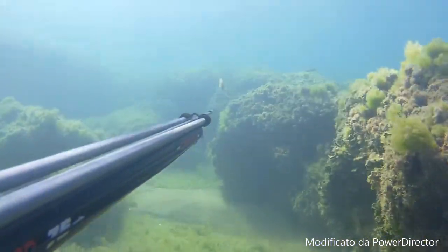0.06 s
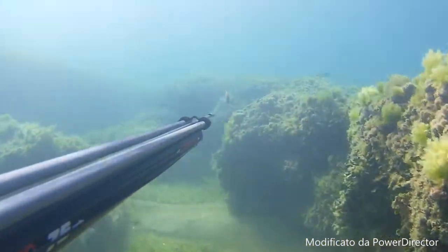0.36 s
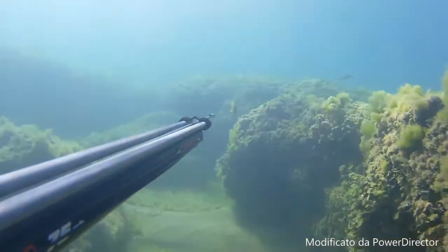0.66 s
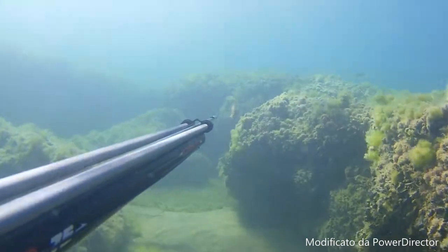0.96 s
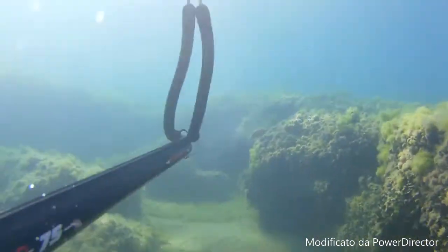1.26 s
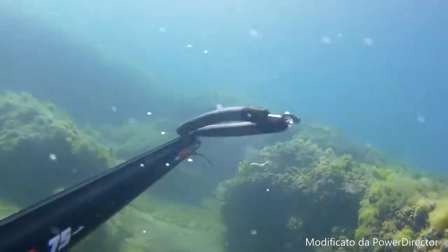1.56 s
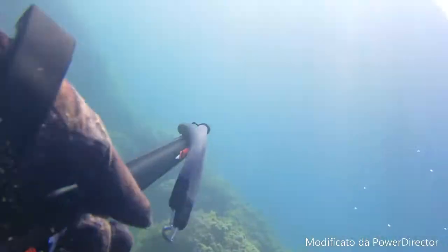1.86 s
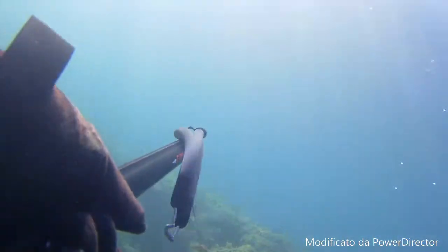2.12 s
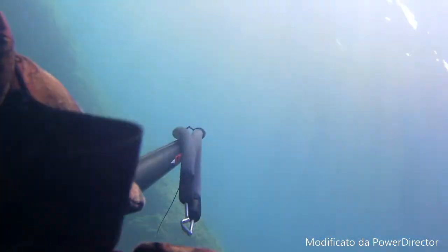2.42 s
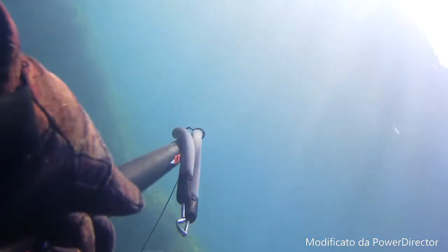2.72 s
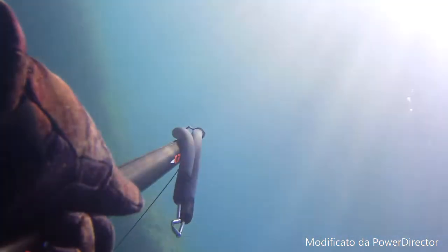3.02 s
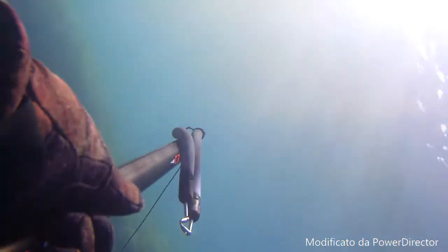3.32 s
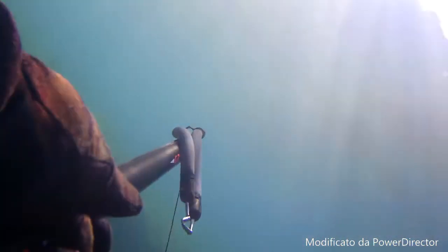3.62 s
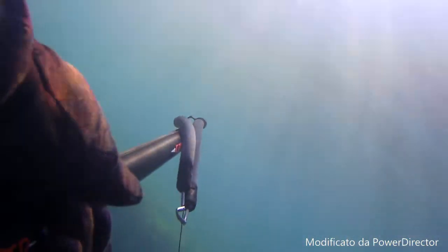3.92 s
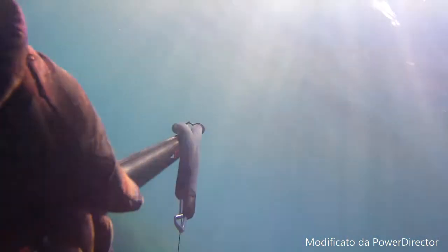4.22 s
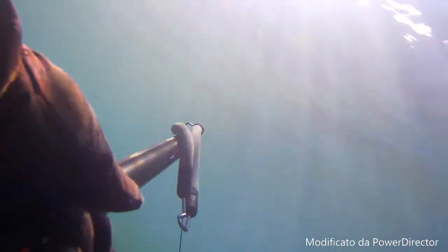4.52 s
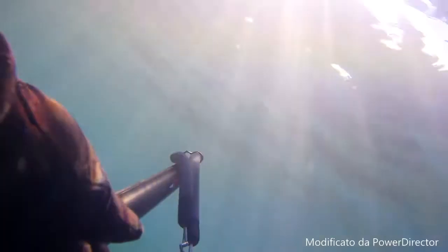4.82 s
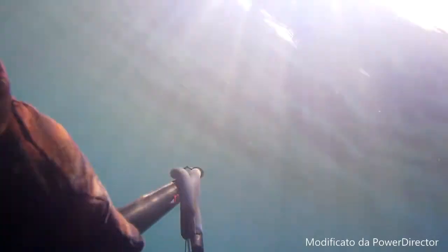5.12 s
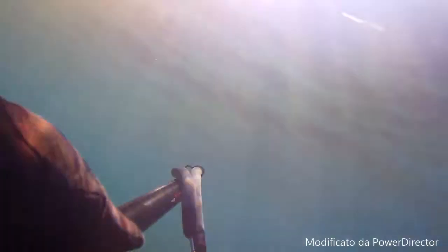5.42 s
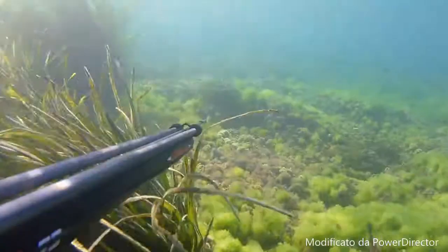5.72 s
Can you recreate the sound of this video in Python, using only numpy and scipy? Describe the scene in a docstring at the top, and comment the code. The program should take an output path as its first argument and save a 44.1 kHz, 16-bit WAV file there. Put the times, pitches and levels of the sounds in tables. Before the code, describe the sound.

A sharp, rattling speargun shot underwater, then bubbles, light clicks, faint glove squeaks and two hard knocks over a soft sea wash.

```python
"""First comes a soft wash of shallow sea over a faint rumble, heard from a camera's watertight case.
Then a rubber-band speargun fires right beside it: the steel spear rattles down the barrel and overloads
the microphone, bubbles churn and the camera mount wobbles. The slack bands and their wishbone (the wire
that pulls the spear) knock about. Later a glove rubs, squeaks and bumps on the case."""
import sys
import numpy as np
from scipy import signal
from scipy.fft import rfft, irfft, next_fast_len
from scipy.io import wavfile

SR = 44100
rng = np.random.default_rng(int(sys.argv[2]) if len(sys.argv) > 2 else 0)


def wrap_up_sound(samples):
    """Save the sound to the file named by the first command line argument, as 16-bit audio."""
    columns = np.atleast_2d(samples).T
    # keep every value between -1 and 1, then stretch to whole-number steps
    tamed = np.clip(columns, -1, 1)
    steps = np.round(tamed * 32767).astype(np.int16)
    wavfile.write(sys.argv[1], SR, steps)


N = 258867
T = np.arange(N) / SR


def undb(db):
    """Turn decibels into a number to multiply by."""
    return 10 ** (np.asarray(db) / 20)


def unit(x):
    """Scale a signal to an average strength (rms) of 1."""
    return x / np.sqrt(np.mean(x ** 2))


def swell(movements, ramp_db=20):
    """Loudness over time: each row climbs ramp_db during its rise, holds, and drops as much in its fall."""
    t = T[::40]
    start, rise, hold, fall, db = np.transpose(movements)[:, :, None]
    before = np.maximum((start + rise - t) / rise, 0)
    after = np.maximum((t - start - rise - hold) / fall, 0)
    gain = undb(db - ramp_db * np.minimum(before + after, 10))
    return np.interp(T, t, np.sqrt(np.sum(gain ** 2, axis=0)))  # overlaps add in power


def colour(x, points, tilt_db=0):
    """Shape the lows and highs by (f/Hz, level/dB) points and a tilt per octave; the result has rms 1."""
    size = next_fast_len(len(x))
    octave = np.log2(np.maximum(np.arange(size // 2 + 1) * SR / size, 1))
    hz, db = np.transpose(points)
    tilted_db = db + tilt_db * np.log2(hz / hz[0])
    gain = undb(np.interp(octave, np.log2(hz), tilted_db))
    return unit(irfft(rfft(x, size) * gain, size)[:len(x)])


def wander(rate):
    """A random curve of rms 1 that changes course about rate times a second."""
    knots = rng.standard_normal(4096)
    return unit(np.interp(T * rate, np.arange(len(knots)), knots))


def ticks(rate, spread_db):
    """Tiny random clicks of uneven size, about rate a second."""
    hits = rng.random(N) < rate / SR
    return hits * rng.choice([-1, 1], N) * undb(spread_db * rng.standard_normal(N))


def fade(t, t60):
    """Die away by 60 dB in t60 seconds, the ring time."""
    return np.exp(-np.log(1000) * t / t60)


def add(out, s, sound):
    """Mix a sound in at s seconds."""
    start = int(s * SR)
    out[start:start + len(sound)] += sound[:N - start]


# Tone of the sea: f/Hz, relative level/dB
SEA_TONE = [(12, -38), (20, -1.5), (38, -8), (55, -23), (81, -12.5), (107, -12.5), (210, -13), (410, -15.5),
            (542, -17.5), (780, -20), (1480, -26.5), (2200, -31.5), (14700, -48.5), (16000, -47)]
def sea(level_db=-53):
    """Shallow water makes a soft, nearly even wash."""
    return undb(level_db + .5 * wander(14)) * colour(rng.standard_normal(N), SEA_TONE)


# Jolts of the camera mount: t/s, slow wobble level/dB, fast wobble level/dB, ring time/s
MOUNT_JOLTS = [(1.1435, 7, 5.5, 0.53), (1.412, -10.5, -36, 0.38), (2.168, -21.5, -30, 0.39),
               (3.476, -23, -34.5, 0.52), (3.72, -24.5, -38, 0.52), (4.226, -29, -57, 0.18),
               (4.588, -20, -9.5, .12), (4.867, -13, -45, 0.1)]
# Sweeps of the gun that push water past the case: t/s, rise/s, hold/s, fall/s, level/dB
WATER_SWEEPS = [(1.128, .012, 0.014, 0.47, -16.5), (1.79, 0.057, 0.023, 0.26, -34),
                (1.895, 0.16, 0.5, .3, -43.5), (3.645, .17, 0.27, 0.12, -43),
                (4.38, 0.18, 0.42, 0.5, -44.5), (5.383, 0.026, .02, 0.11, -42)]
def mount(wobble_hz=(26.97, 52.48), still_db=-63):
    """The camera mount rumbles faintly at rest, more as water sweeps past, and wobbles after each jolt."""
    out, t = np.zeros(N), T[:SR]
    for s, *levels_db, t60 in MOUNT_JOLTS:
        wobble = sum(undb(db) * np.sin(2 * np.pi * hz * t) for hz, db in zip(wobble_hz, levels_db))
        add(out, s, wobble * fade(t, t60))
    rumble_tone = [(5, -13.5), (18, -8), (27, 4.5), (38, -10), (53, -8), (72, -21.5), (115, -18),
                   (180, -35), (400, -32.5), (2000, -90)]  # f/Hz, relative level/dB
    surge = undb(still_db) + swell(WATER_SWEEPS)
    return out + surge * colour(rng.standard_normal(N), rumble_tone)


# Clouds of bubbles behind the spear: t/s, rise/s, hold/s, fall/s, level/dB
BUBBLE_CLOUDS = [(1.126, 0.023, .13, 0.15, -23.5), (1.705, 0.013, 0.056, 0.083, -40.5),
                 (1.79, 0.056, 0.15, 0.29, -37.5), (2.05, 0.034, .02, .1, -45),
                 (2.2, 0.13, 0.29, 0.26, -60.5)]
# Tone of the bubbles through the case: f/Hz, relative level/dB
BUBBLE_TONE = [(88, -45), (150, -13.5), (187, -27), (243, -2.5), (367, -12.5), (478, 0.5), (651, 0.5),
               (799, -10.5), (912, -14), (1320, -31), (1480, -14), (1790, -20), (2510, -27), (2700, -45.5),
               (5000, -54.5), (6500, -81.5), (11000, -120)]
def bubbles():
    """Many small bubbles pulse in the spear's wake and blend into a churn."""
    loudness = swell(BUBBLE_CLOUDS) * undb(0.7 * wander(49))
    return loudness * colour(ticks(rate=1500, spread_db=2.5), BUBBLE_TONE)


# Tone of the short, noisy crack in any blow: f/Hz, relative level/dB
CRACK_TONE = [(60, -13), (250, -0.5), (700, 6.5), (1200, 8), (1800, -5.5), (2500, -6), (3100, -35),
              (5000, -42), (9000, -41.5), (16000, -50)]
def blow(notes, tilt_db, stretch, crack_db, crack_t60, detune, uneven_db, contact_s=.0008):
    """A struck object cracks and rings briefly under water; a harder hit brings out its high notes."""
    t = T[:SR // 9]
    hz, db, t60 = np.transpose(notes)[:, :, None]
    pitch = hz * (1 + detune * rng.standard_normal(hz.shape))
    db = db + tilt_db * np.log2(hz / hz[0])
    db += uneven_db * rng.standard_normal(hz.shape)  # each blow lands on another spot
    sign = (-1) ** np.arange(len(hz))[:, None]  # neighbouring notes swing opposite ways
    ring = np.sum(sign * undb(db) * fade(t, t60 * stretch) * np.sin(2 * np.pi * pitch * t), axis=0)
    crack = colour(rng.standard_normal(len(t)), CRACK_TONE, tilt_db / 2) * fade(t, crack_t60 * stretch)
    onset = 1 - np.exp(-(t / contact_s) ** 2)  # water cushions the contact
    return onset * (ring / np.abs(ring).max() + undb(crack_db) * crack)


# Blows on the gun: t/s, level/dB, brightness/(dB per octave), ring time multiplier, bounce delay/s
GUN_BLOWS = [(1.1322, -14, 4.5, 2.5, 0.0024), (1.1365, 7, 4.5, 0.39, 0.0038),
             (1.139, 25, 0.5, 0.38, 0.0046), (1.1477, 23.5, 3.5, .25, .002), (1.1634, 7, 16, 0.28, 0.0042),
             (1.1733, 14.5, 7, 0.39, 0.0065), (1.183, 20.5, -5.5, 0.32, 0.0037),
             (1.195, 7.5, 14.5, 0.38, .007), (1.2085, 22, 8, 0.21, 0.0041),
             (1.221, 16.5, 13.5, 0.37, 0.014), (1.2375, 9, -1.5, 0.43, .0125),
             (1.264, 9.5, 7, 0.24, 0.0061), (1.2884, -2, -5, 0.91, .0135), (1.32, -3, -1.5, 0.59, .017),
             (1.356, -22, 11, 0.69, 0.017), (1.385, -12, 3, 0.41, 0.0022),
             (1.3895, -5.5, 6.5, 1.63, 0.0048), (1.415, -9.5, -1, .63, .018),
             (1.458, -26.5, -4, 0.85, .005), (1.633, -22, -3, 0.88, 0.016),
             (1.711, -25.5, -5.5, 0.68, 0.015), (1.7835, -34, -15, .71, .006),
             (1.9653, -22, -15, 1.3, 0.014), (1.997, 0, 2.5, 0.76, 0.0087), (2.1143, -18, -4, 0.63, 0.0052),
             (2.139, -27.5, -4, 1.9, .008), (2.1712, -27, 6.5, 1.7, 0.016), (2.357, -41, 3, 0.49, 0.0064),
             (2.397, -38, -4, 2.2, .008), (2.468, -41, -11.5, 0.8, 0.026), (2.531, -46.5, 10.5, 1, 0.0055),
             (2.56, -45.5, 2.5, 1.03, .006), (5.773, -35.5, -8.5, 1.32, .006)]
# Notes the gun rings at: f/Hz, relative level/dB, base ring time/s
GUN_NOTES = [(240, -29.5, 0.15), (487, -8.5, 0.078), (595, -14, 0.038), (679, -2, .08), (852.5, -15, 0.046),
             (1040, -8.5, 0.044), (1125, -22, 0.021), (1475, -6, 0.056), (1673, -8.5, 0.044),
             (1768, -3.5, 0.034), (2299, -10, 0.019), (2432, -10, 0.029), (3223, -29.5, .022),
             (4430, -25, 0.0085), (5250, -38, .028)]
def gun(bounce_db=-10.5):
    """Trigger and spear hammer the gun, then wishbone and line tap it. Every blow bounces once."""
    out = np.zeros(N)
    for s, db, tilt_db, stretch, delay in GUN_BLOWS:
        for hit_s, hit_db in [(s, db), (s + delay, db + bounce_db)]:
            clack = blow(GUN_NOTES, tilt_db, stretch,
                         crack_db=-11.5, crack_t60=0.036, detune=0.021, uneven_db=3.5)
            add(out, hit_s, undb(hit_db) * clack)
    return out


# The spear's one slide along its track: t/s, rise/s, hold/s, fall/s, level/dB
SPEAR_SLIDE = (1.1577, 0.0377, 0.06, 0.0474, -2.5)
# Tone of the track: f/Hz, relative level/dB
TRACK_TONE = [(90, -5.5), (330, -4.5), (570, -3.5), (680, 7), (800, -3.5), (1150, -8), (1700, -8),
              (2500, -16), (3200, -28), (8000, -51.5), (16000, -60)]
def spear_scrape():
    """Between the hard blows, the sliding steel chatters and keeps the barrel ringing."""
    return swell([SPEAR_SLIDE]) * colour(ticks(rate=3100, spread_db=3.5), TRACK_TONE)


# The wishbone's harder knocks: t/s, level/dB
WISHBONE_KNOCKS = [(1.308, -51), (1.356, -56), (1.394, -38)]
# Notes the wishbone rings at: f/Hz, relative level/dB, ring time/s
WISHBONE_NOTES = [(4440, -10, 0.13), (4860, -3, 0.057), (6660, -4, 0.055)]
def wishbone():
    """The thin steel wire pings when knocked, and the water soon quiets it."""
    out, t = np.zeros(N), T[:SR // 4]
    ping = sum(undb(db) * np.sin(2 * np.pi * hz * t) * fade(t, t60) for hz, db, t60 in WISHBONE_NOTES)
    for s, db in WISHBONE_KNOCKS:
        add(out, s, undb(db) * ping)
    return out


# Bumps on the case: t/s, shell level/dB, brightness/(dB per octave), ring time multiplier, thud level/dB
CASE_BUMPS = [(1.392, -1.5, -7, 1, -30.5), (3.4743, -13, -2.5, 1.4, -23.5), (3.603, -32.5, -3, .35, -48.5),
              (3.721, -26.5, 0.5, 1.8, -25.5), (4.004, -22.5, 4, 0.74, -25), (4.223, -32, 1, 0.66, -46),
              (4.5728, 4.5, -11, 0.35, 2.5), (4.576, 28.5, 8.5, .26, -3), (4.6666, -15.5, 3, 0.94, -11),
              (4.699, -14.5, 5, 0.86, -11.5), (4.8476, -31, -1, 0.45, -4), (4.8533, 26, 4, .33, -2),
              (4.858, 3, -7, 0.45, -6.5), (5.083, -42.5, 10.5, .73, -54), (5.489, -33, -9, 1, -44),
              (5.638, -33.5, -14, 1, -50.5)]
# Notes the case rings at: f/Hz, relative level/dB, base ring time/s
CASE_NOTES = [(144.4, -10.5, 0.023), (261.4, -5.5, 0.058), (336, -7.5, 0.049), (510, -0.5, 0.043),
              (751, 0, 0.029), (1049, -5, 0.033), (1328, -8, 0.035), (1565, -14, 0.04),
              (1814, -10.5, 0.042), (2630, -48, 0.025), (3730, -33, 0.012)]
def case(thud_hz=62, thud_t60=0.019, give_s=0.00067, thud_lag_s=.003):
    """A bump rings the case's shell; just after, the wall gives way with a dull thud."""
    out, t = np.zeros(N), T[:SR // 5]
    thud = -np.sin(2 * np.pi * thud_hz * t) * fade(t, thud_t60) * (1 - np.exp(-t / give_s))
    thud /= np.abs(thud).max()
    for s, db, tilt_db, stretch, thud_db in CASE_BUMPS:
        shell = blow(CASE_NOTES, tilt_db, stretch,
                     crack_db=-13.5, crack_t60=0.041, detune=0.039, uneven_db=5)
        add(out, s, undb(db) * shell)
        add(out, s + thud_lag_s, undb(thud_db) * thud)
    return out


# Glove strokes, brighter when faster: t/s, rise/s, hold/s, fall/s, level/dB, extra treble/dB
GLOVE_STROKES = [(2.039, .03, 0.16, 0.057, -55, 3.5), (2.157, 0.024, 0.0058, 0.016, -31.5, 6.5),
                 (3.161, 0.038, .09, .035, -55.5, 8.5), (3.566, 0.077, 0.026, 0.026, -43, -17),
                 (3.72, 0.016, 0.0067, 0.054, -36, -3.5), (3.811, 0.059, 0.12, 0.11, -45.5, 12),
                 (3.971, 0.055, 0.04, 0.032, -38.5, 2), (4.081, 0.065, .04, 0.16, -45.5, -9),
                 (4.286, 0.091, .015, .15, -47, -9), (4.404, .14, 0.033, .05, -42.5, -11),
                 (4.573, 0.02, 0.074, 0.012, -27.5, -14.5), (4.68, 0.017, 0.0051, 0.025, -24, -24),
                 (4.687, 0.054, 0.17, .07, -51, 1.5), (4.937, 0.023, 0.0091, 0.1, -49.5, -1.5),
                 (5.479, 0.074, 0.011, 0.041, -41.5, -2)]
# Tone of the rubbing: f/Hz, relative level/dB
RUB_TONE = [(88, -37), (150, -2.5), (235, -4), (309, -7.5), (414, -4.5), (555, -2.5), (662, -1.5),
            (837, 2.5), (979, -5.5), (1140, -2.5), (1290, -8), (1530, -3.5), (2600, -12), (3700, -37),
            (16000, -57)]
# Squeezes of the grip: middle t/s, spread either side/s, level/dB
GRIP_SQUEEZES = [(2.189, 0.0042, -45.5), (3.747, 0.008, -49.5), (4.007, 0.058, -48.5),
                 (4.633, 0.033, -41.5), (4.699, 0.0034, -36.5), (5.558, 0.0057, -47.5)]
# Tone of the rasping rubber: f/Hz, relative level/dB
RASP_TONE = [(1500, 9.5), (3300, 7.5), (5000, -3.5), (8000, -10), (16000, -28)]
def glove(split_hz=1400):
    """The glove sticks and slips on the case in tiny ticks; a tighter grip adds a bright rasp."""
    rub = colour(ticks(rate=2500, spread_db=4), RUB_TONE)
    lows = signal.sosfiltfilt(signal.butter(2, split_hz, fs=SR, output="sos"), rub)
    highs = rub - lows
    low_gain = swell([(*timing, db) for *timing, db, _ in GLOVE_STROKES])
    high_gain = swell([(*timing, db + treble_db) for *timing, db, treble_db in GLOVE_STROKES])
    slide = undb(0.68 * wander(90)) * (low_gain * lows + high_gain * highs)
    grip = sum(undb(db) * np.exp(-.5 * ((T - s) / spread) ** 2) for s, spread, db in GRIP_SQUEEZES)
    rasp = colour(ticks(rate=1700, spread_db=3), RASP_TONE)
    return slide + grip * rasp


# Hoarse squeaks of the rubber: t/s, length/s, f/Hz, band width/Hz, level/dB
RUBBER_SQUEAKS = [(2.141, 0.058, 2550, 295, -46), (3.17, 0.14, 1700, 374, -52),
                  (3.177, 0.15, 734, 254, -54.5), (3.852, 0.27, 847, 149, -43),
                  (3.863, 0.173, 1600, 398, -44), (4.594, 0.096, 1670, 380, -44.5),
                  (5.555, 0.012, 2460, 250, -46)]
def squeaks():
    """The rubber catches, and its uneven slips keep one rough note ringing for a moment."""
    out = np.zeros(N)
    for s, length, hz, width, db in RUBBER_SQUEAKS:
        slips = ticks(rate=2000, spread_db=3)[:int(length * SR)]
        band = signal.butter(2, [hz - width / 2, hz + width / 2], "band", fs=SR, output="sos")
        ringing = unit(signal.sosfilt(band, slips))
        add(out, s, undb(db) * ringing * signal.windows.tukey(len(slips), .15))
    return out


def scene():
    """The shot, the handling and the sea all reach one microphone through the case."""
    shot = gun() + spear_scrape() + wishbone() + bubbles()
    handling = case() + mount() + glove() + squeaks()
    return (shot + handling + sea())[None]


def record(dry, ceiling=0.46, top_hz=16200):
    """Loud blows overload the microphone, which flattens their peaks; then the highest treble is cut."""
    fine = signal.resample_poly(dry, 2, 1, axis=-1)  # twice the samples, for cleaner clipping
    clipped = signal.resample_poly(np.clip(fine, -ceiling, ceiling), 1, 2, axis=-1)
    return signal.sosfilt(signal.ellip(10, .1, 80, top_hz, fs=SR, output="sos"), clipped)


dry = scene()
out = record(dry)
wrap_up_sound(out)
```